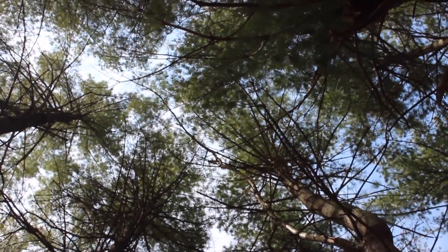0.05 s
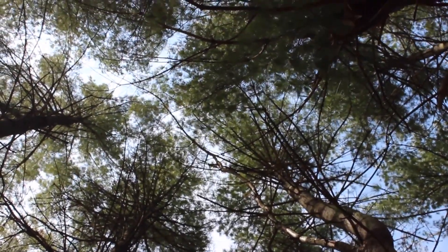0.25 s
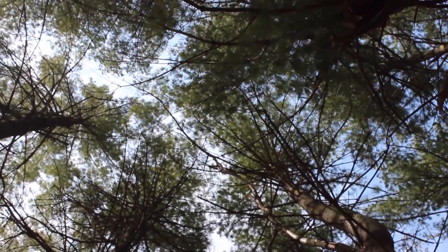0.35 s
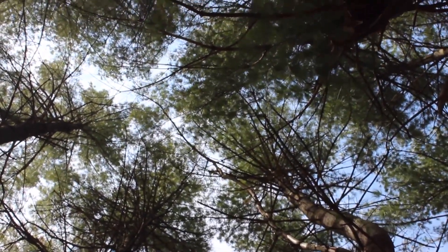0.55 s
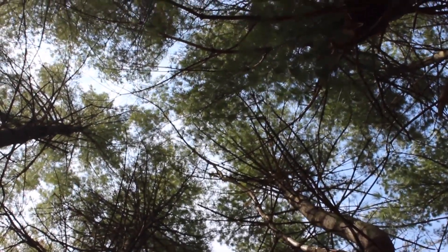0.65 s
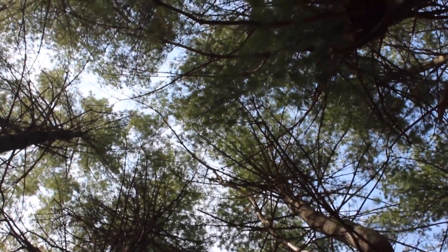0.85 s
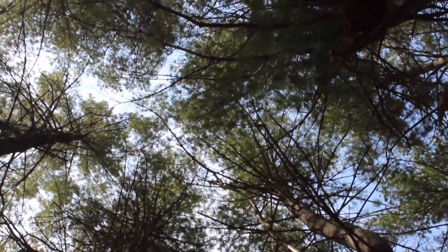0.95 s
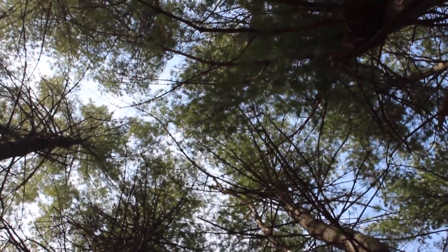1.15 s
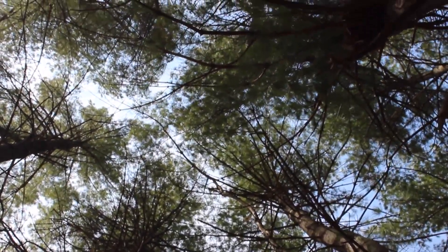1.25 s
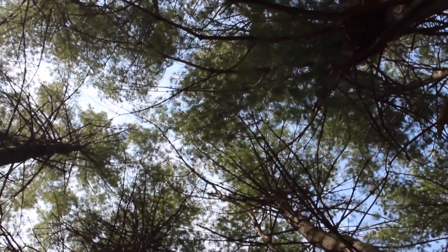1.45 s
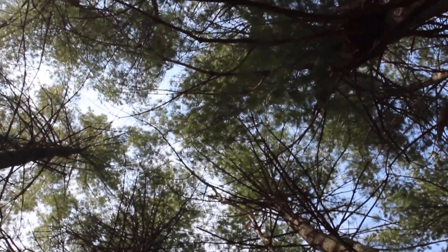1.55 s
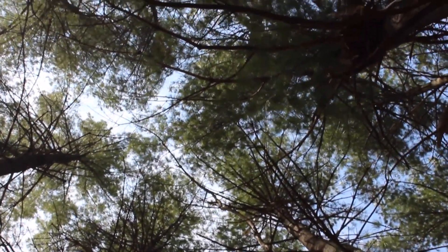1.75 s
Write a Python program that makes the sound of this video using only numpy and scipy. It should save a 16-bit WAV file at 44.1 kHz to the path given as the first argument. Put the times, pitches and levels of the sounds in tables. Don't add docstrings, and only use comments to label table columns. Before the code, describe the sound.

Wind blows through tall pine crowns, a soft, even, distant rush with a wide fine needle hiss throughout. From about 0.2 s a gust hits the small camera microphone: low, centred, irregular thuds and fluttering rumble, strongest around 0.4 to 0.6 s, with more bumps from 0.7 to 1.15 s. After 1.2 s only weak puffs remain under the steady rush until about 1.8 s.

```python
import sys
import numpy as np
from scipy import signal
from scipy.fft import rfft, irfft
from scipy.io import wavfile
from scipy.ndimage import uniform_filter1d, map_coordinates

SR = 44100
rng = np.random.default_rng(int(sys.argv[2]) if len(sys.argv) > 2 else 0)


def dump(signal):
    limited = np.clip(np.atleast_2d(signal).T, -1, 1)
    pcm = np.round(limited * 32767).astype(np.int16)
    wavfile.write(sys.argv[1], SR, pcm)


def decibels_to_gain(level_db):
    exponent = np.asarray(level_db, float) / 20
    return 10 ** exponent


N = 79380
BIN_HZ = np.fft.rfftfreq(N, 1 / SR)


def unit(x):
    return x / np.sqrt(np.mean(x ** 2) + 1e-20)


def curve(rows, column=1):
    rows = np.array(rows)
    return np.interp(np.arange(N) / SR, rows[:, 0], rows[:, column])


def wobble(knots_per_s):
    return map_coordinates(rng.standard_normal(400), [np.arange(N) * knots_per_s / SR], mode="wrap")


def rush(spectrum, patchy_db):
    cells = signal.stft(rng.standard_normal(N + 512), nperseg=512)[2]
    field = uniform_filter1d(rng.standard_normal(cells.shape), size=6, axis=0)
    field = uniform_filter1d(field, size=12, axis=1)
    noise = signal.istft(cells * decibels_to_gain(patchy_db * unit(field)), nperseg=512)[1][:N]
    freq_hz, density_db = np.transpose(spectrum)
    colour_db = np.interp(np.log(BIN_HZ + 1), np.log(freq_hz + 1), density_db, left=-120)
    return unit(irfft(rfft(noise) * decibels_to_gain(colour_db), N))


def pine_crowns():
    # time_s, wind_strength_db, far_crowns_db, near_twigs_db (last two relative to the wind)
    wind = [(0, -58, -2, 2), (.2, -58.5, -0.5, -.5), (.4, -58.5, 0.7, 0), (.55, -57.5, 0, 0),
            (.75, -58, 0, -0.5), (.95, -57.5, -0.5, 1.5), (1.1, -57.2, -.5, -2.5), (1.25, -58, 0, 0.8),
            (1.5, -58.5, -1, -1), (1.8, -58.5, 0, -1)]
    # freq_hz, density_db_per_hz
    sough = [(210, -16.5), (350, -2.5), (474, -3), (505, -2), (1020, -2), (2770, -14.5), (9590, -21.5),
             (14300, -27), (15700, -29)]
    # freq_hz, density_db_per_hz
    needles = [(110, -39), (180, -8), (293, -3.5), (666, -4.5), (718, -4.5), (1600, -6), (3790, -5),
               (12100, -11.5), (15700, -16)]
    sough_db, needles_db = -49, -54.5
    swell_db, patch_db = 0.19, 0.41
    far_hz, twig_hz = 1300, 3000

    strength_db = curve(wind)
    swell = decibels_to_gain(strength_db - strength_db.mean() + swell_db * wobble(9.44))
    mid = decibels_to_gain(sough_db) * rush(sough, patch_db)
    side = decibels_to_gain(needles_db) * rush(needles, patch_db)
    pair = rfft(np.array([mid + side, mid - side]))

    below_twig = 1 / (1 + (BIN_HZ / twig_hz) ** 4)
    below_far = 1 / (1 + (BIN_HZ / far_hz) ** 4)
    far = irfft(pair * below_far, N)
    twigs = irfft(pair * (below_twig - below_far), N)
    hiss = irfft(pair * (1 - below_twig), N)
    return swell * (decibels_to_gain(curve(wind, 2)) * far + decibels_to_gain(curve(wind, 3)) * twigs + hiss)


def gust_flutter():
    # time_s, flutter_level_db
    gust = [(0, -58), (.1, -54.5), (.18, -51.5), (.22, -49), (.45, -46), (.55, -44.5), (.65, -51.5),
            (.95, -45.5), (1.02, -46.5), (1.14, -48.5), (1.2, -53), (1.4, -53.5), (1.45, -55),
            (1.55, -52.5), (1.67, -54.5), (1.8, -51)]
    # freq_hz, density_db_per_hz
    common = [(15, -53), (35, -34), (60, -6.5), (90, -3), (140, -2), (200, -5.5), (270, -6), (450, -37.5)]
    # freq_hz, density_db_per_hz
    unlike = [(100, -9), (170, -8.5), (280, 4), (400, -8), (700, -43)]
    lump_db, side_db = 1, -25.5

    gust_gain = decibels_to_gain(curve(gust) + lump_db * wobble(30))
    mid = rush(common, 1.27)
    side = decibels_to_gain(side_db) * rush(unlike, 4.1)
    return gust_gain * np.array([mid + side, mid - side])


def eddies():
    # centre_s, length_s, peak_db, pitch_hz
    strong = [(0.231, 0.065, -33.5, 117), (0.312, 0.047, -35.6, 105), (0.328, 0.036, -32.8, 174),
              (0.366, 0.15, -35, 151.4), (0.384, 0.056, -24.5, 109.8), (0.415, 0.013, -35.5, 192),
              (0.443, 0.021, -38, 150), (0.456, 0.016, -28.5, 233), (0.48, 0.11, -31, 96.5),
              (0.485, 0.041, -37, 127), (0.493, 0.079, -42.5, 250), (0.511, 0.037, -25.5, 155),
              (0.525, 0.038, -32, 132), (0.561, 0.018, -20, 140), (0.561, 0.015, -33, 230),
              (0.569, 0.014, -36, 300), (0.701, 0.024, -28, 104), (0.722, 0.02, -35.5, 163),
              (0.75, 0.088, -31, 99), (0.767, 0.012, -33, 192), (0.801, 0.025, -30, 121),
              (0.851, 0.027, -30.5, 128), (0.885, 0.084, -35.5, 110), (0.908, 0.013, -27, 198),
              (0.956, 0.085, -27, 98.7), (0.961, 0.049, -30.5, 190.3), (0.962, 0.058, -34, 139),
              (1.045, 0.036, -35, 149), (1.102, 0.032, -35.5, 165), (1.138, 0.018, -29.5, 105)]
    # centre_s, length_s, peak_db, pitch_hz
    puffs = [(0.223, 0.024, -37.5, 178), (0.253, 0.014, -36, 180), (0.27, 0.03, -37, 110),
             (0.298, 0.046, -40.5, 175), (0.346, 0.07, -41, 100), (0.367, 0.016, -51, 229),
             (0.39, 0.029, -42, 230), (0.395, 0.04, -44, 140), (0.468, 0.012, -52, 270),
             (0.508, 0.012, -40, 307), (0.59, 0.02, -37, 141), (0.614, 0.028, -36, 124),
             (0.683, 0.019, -37.5, 170), (0.839, 0.015, -42, 181), (0.86, 0.021, -42, 203),
             (0.922, 0.01, -37, 230), (0.938, 0.0094, -31, 150), (0.98, 0.059, -55, 112),
             (1.075, 0.05, -45, 155), (1.124, 0.013, -32.5, 150), (1.16, 0.019, -40, 94),
             (1.2, 0.025, -43.5, 124), (1.237, 0.05, -44.5, 159), (1.333, 0.019, -41.5, 138),
             (1.362, 0.014, -49, 157), (1.391, 0.051, -43.5, 168), (1.5, 0.04, -48, 150),
             (1.527, 0.026, -41, 152), (1.589, 0.02, -44, 132), (1.737, 0.091, -48, 132)]
    pitch_drift, skew_share, push_share = 0.043, 0.066, 0.083
    push_s, low_cut_hz = 0.018, 68

    t = np.arange(N) / SR
    swirl, push = np.zeros(N), np.zeros(N)
    drift_s = np.cumsum(1 + pitch_drift * wobble(60)) / SR
    rows = list(strong) + list(puffs)
    for (centre_s, length_s, peak_db, pitch_hz), start in zip(rows, rng.random(len(rows))):
        shape = np.cos(np.pi * np.clip((t - centre_s) / length_s, -0.5, 0.5)) ** 2
        phase = 2 * np.pi * (pitch_hz * (drift_s - np.interp(centre_s, t, drift_s)) + start)
        swirl += decibels_to_gain(peak_db) * shape * (np.cos(phase) + shape * skew_share * np.cos(2 * phase))
        push_peak = decibels_to_gain(peak_db) * push_share * push_s / length_s * np.sign(start - 0.5)
        push += push_peak * np.exp(-((t - centre_s) / (push_s / 4)) ** 2)
    low_cut = 1 / (1 + (low_cut_hz / (BIN_HZ + 1)) ** 6)
    return irfft(rfft(swirl) * low_cut, N) + push


def scene():
    return pine_crowns() + gust_flutter() + eddies()


def roll_off(x):
    return signal.sosfilt(signal.butter(12, 15850, fs=SR, output="sos"), x)


def record(dry):
    roll_hz, limit_hz, roll_db = 14800, 15730, -2
    response = decibels_to_gain(np.interp(BIN_HZ, [roll_hz, limit_hz], [0, roll_db])) * (BIN_HZ < limit_hz)
    mix = irfft(rfft(dry) * response, N)
    return roll_off(mix)


dry = scene()
out = record(dry)
dump(out)
```